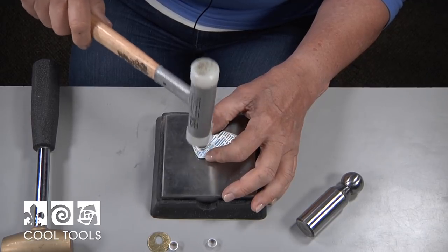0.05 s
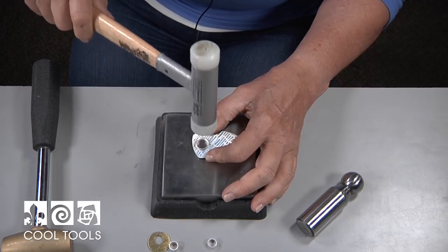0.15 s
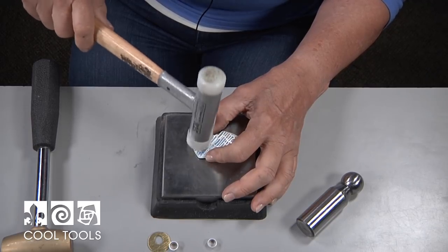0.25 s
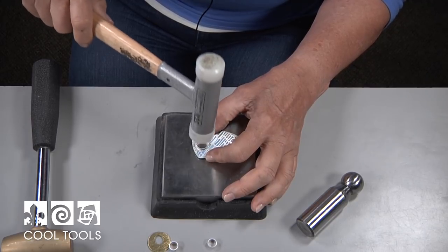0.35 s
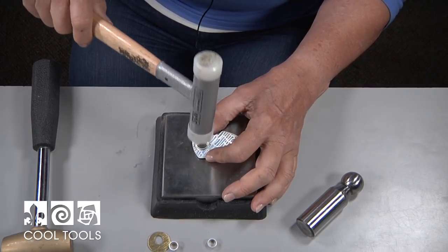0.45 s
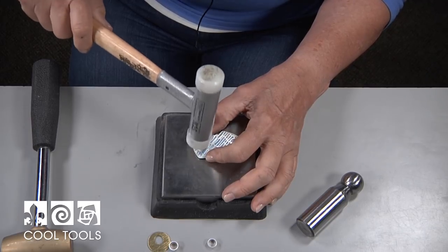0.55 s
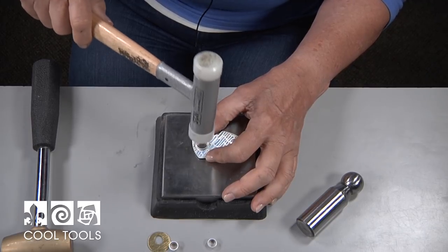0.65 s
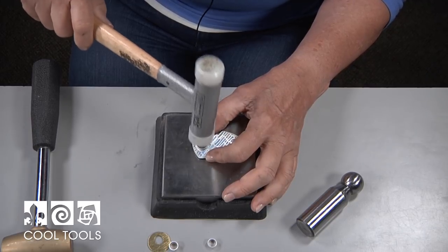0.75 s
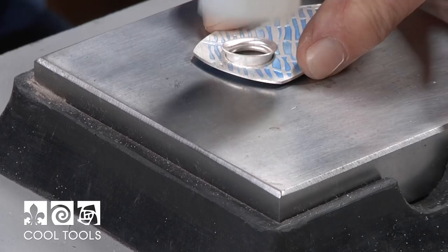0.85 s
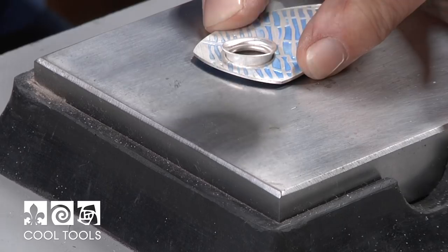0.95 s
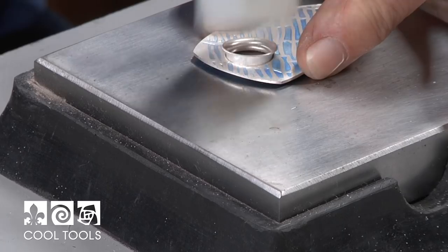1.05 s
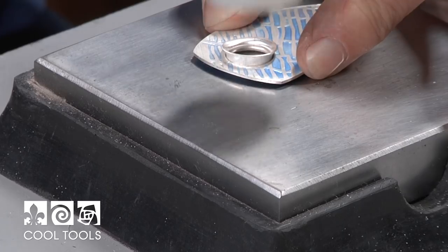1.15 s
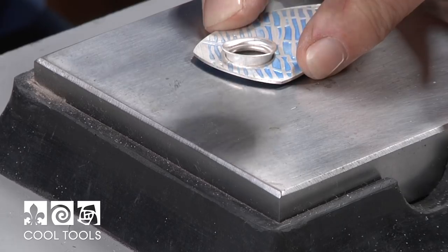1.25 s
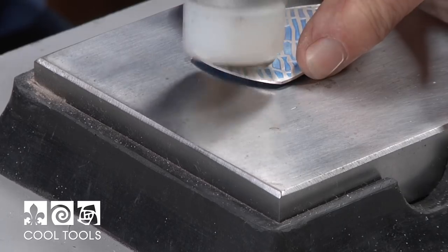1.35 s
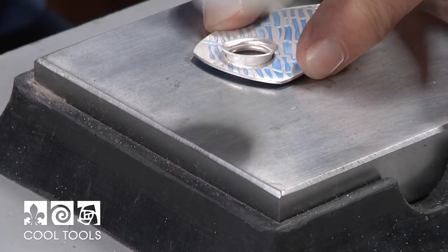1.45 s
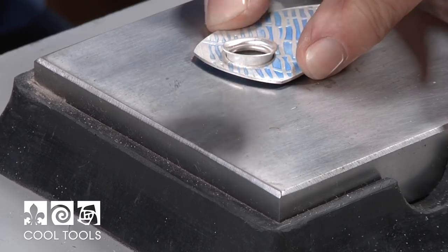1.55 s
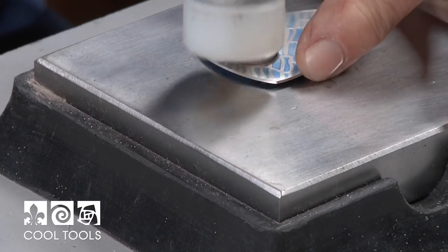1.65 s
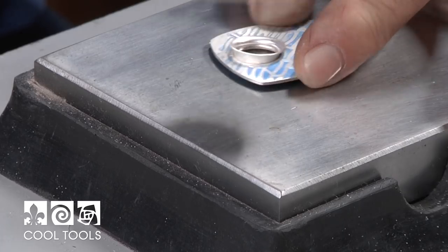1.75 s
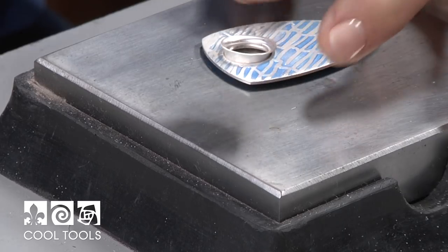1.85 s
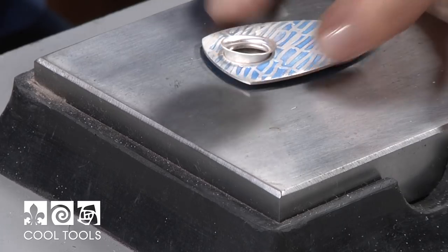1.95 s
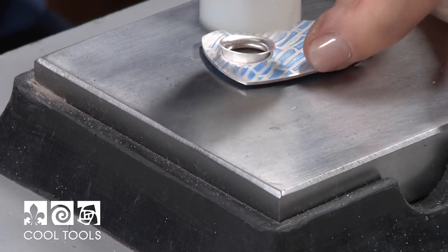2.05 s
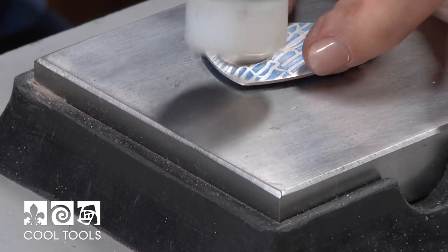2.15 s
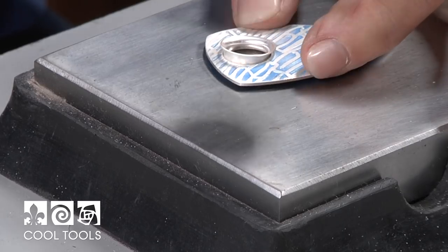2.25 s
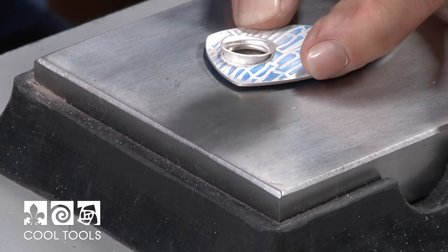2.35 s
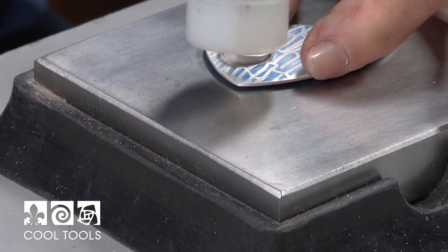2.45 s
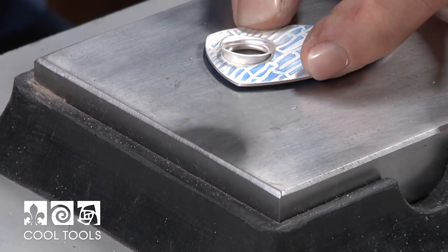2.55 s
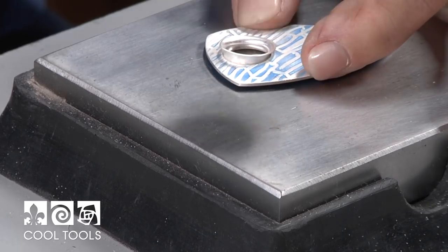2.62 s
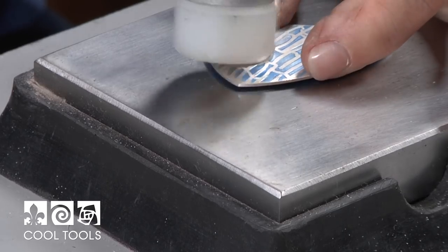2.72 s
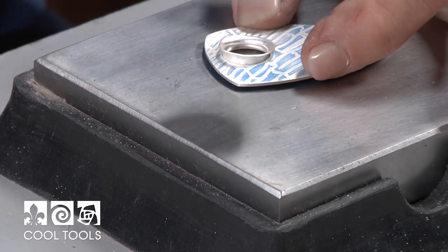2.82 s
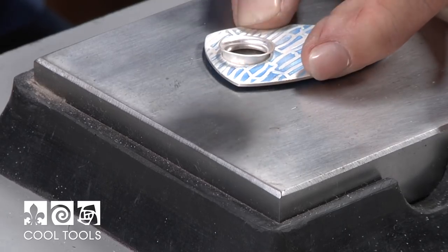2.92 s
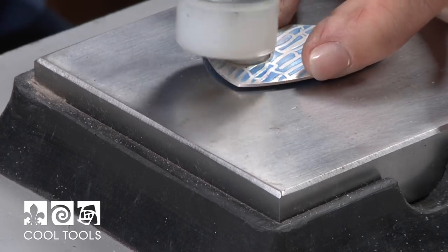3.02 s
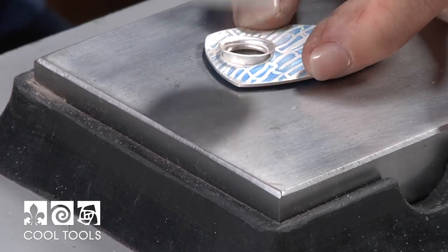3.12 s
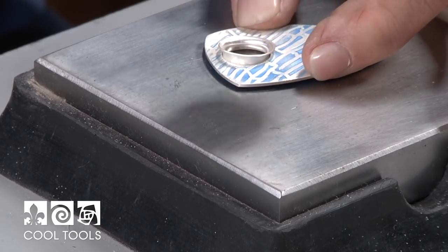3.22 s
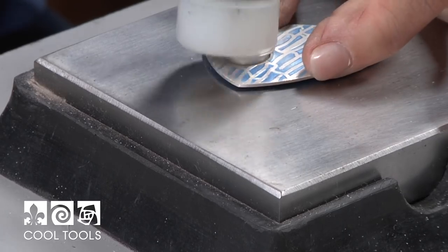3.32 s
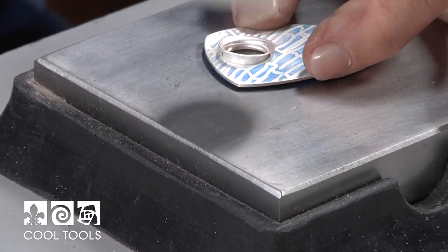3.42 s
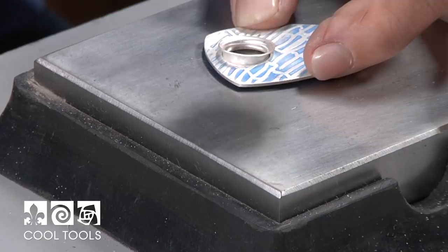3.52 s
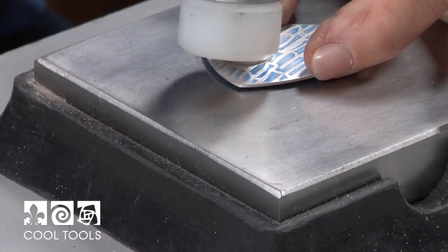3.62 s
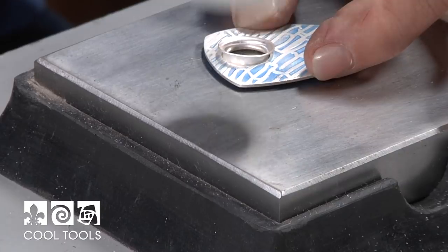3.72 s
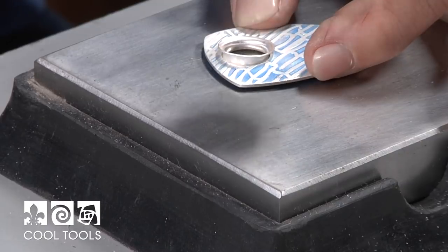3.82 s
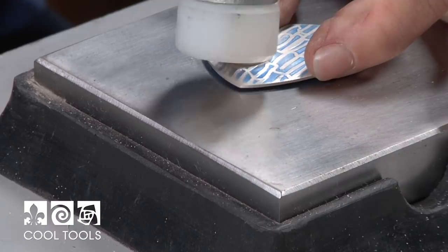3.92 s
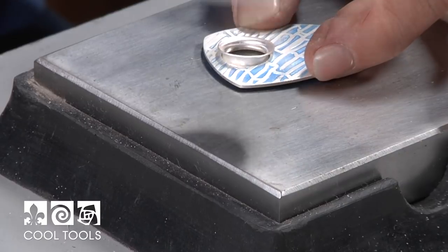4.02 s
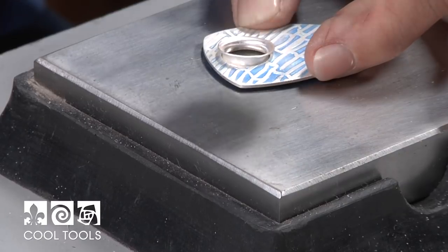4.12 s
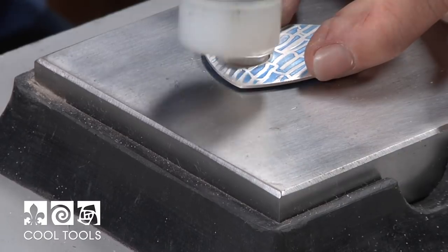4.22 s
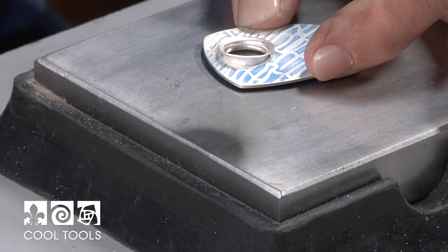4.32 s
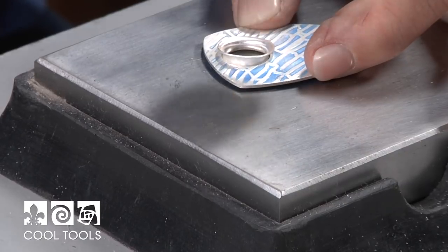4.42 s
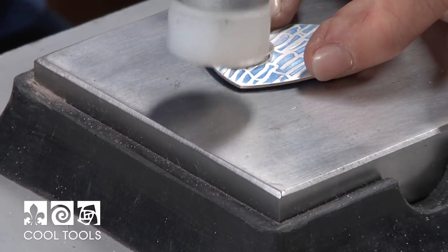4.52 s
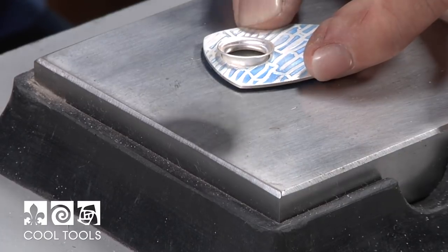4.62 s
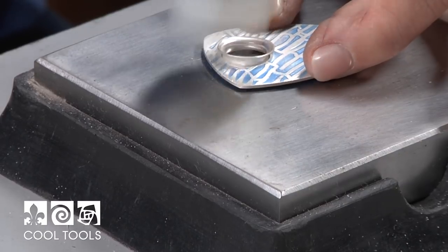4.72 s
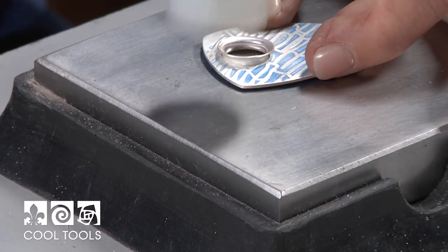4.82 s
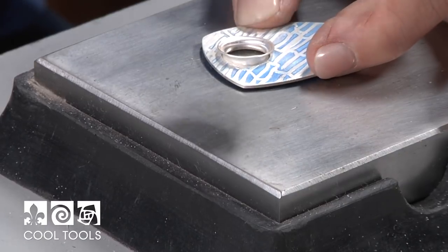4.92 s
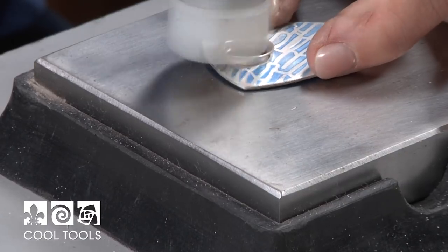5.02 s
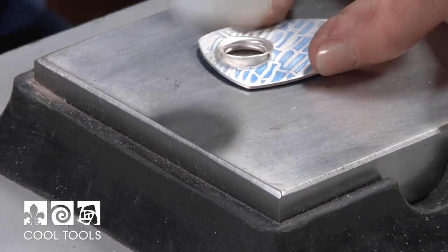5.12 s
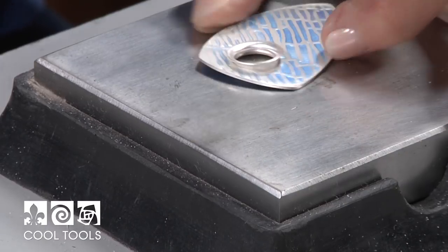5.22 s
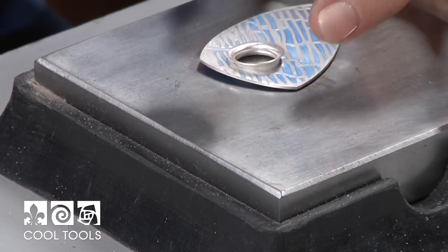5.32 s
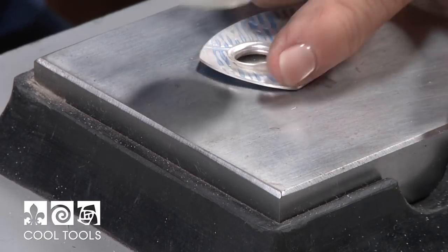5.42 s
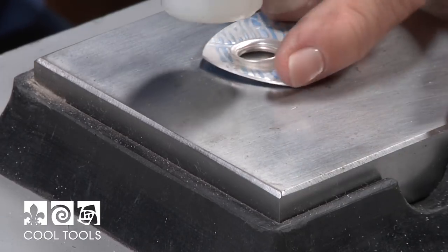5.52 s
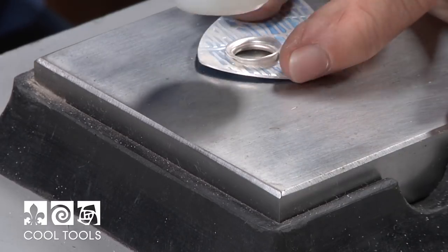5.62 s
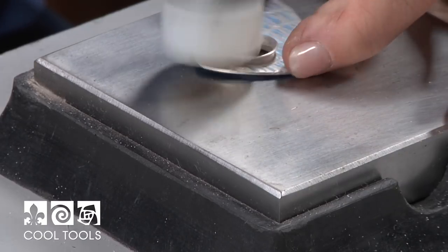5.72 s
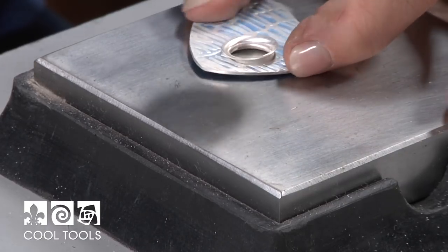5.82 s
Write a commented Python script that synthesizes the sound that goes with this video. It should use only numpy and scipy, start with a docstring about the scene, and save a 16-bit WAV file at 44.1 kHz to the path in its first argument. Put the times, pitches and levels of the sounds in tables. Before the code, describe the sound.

A plastic-faced mallet taps a small silver piece on a steel block in steady hard knocks, with metallic chatter and faint ring, in a small workshop.

```python
"""A plastic-faced mallet taps a silver rivet on a steel bench block, about three and a half blows a second.
Each blow thuds through the block's rubber base into the bench, knocks the more sharply the harder it lands,
chatters the silver against the steel and rings the block faintly. Twice the fingers shift the piece, which
ticks and scrapes on the steel. All is close to the microphone; a small workshop answers over a low rumble.
Thud, ring and silver are decaying modes; knock, chatter, echo and room air are shaped noise."""
import sys
import numpy as np
from scipy import signal
from scipy.fft import rfft, irfft
from scipy.io import wavfile

SR = 44100
rng = np.random.default_rng(int(sys.argv[2]) if len(sys.argv) > 2 else 0)


def store_wav(level_fs):
    """Save 16-bit WAV to argv[1]."""
    pcm = np.round(np.clip(np.atleast_2d(level_fs), -1, 1) * 32767)
    wavfile.write(sys.argv[1], SR, pcm.T.astype(np.int16))


N = 258867
T = np.arange(SR // 2) / SR  # seconds since a sound began
HEAD = SR // 20  # level() sets the rms of a sound's first twentieth of a second


def undb(db):
    """Decibels to gain."""
    return 10 ** (np.asarray(db) / 20)


def level(x, db):
    """Set the rms level of a short sound over its head."""
    return x * undb(db) / np.sqrt(np.mean(x[:HEAD] ** 2))


def add(out, start_s, x):
    """Mix x into out, starting at start_s."""
    i = max(int(start_s * SR), 0)
    out[i:i + len(x)] += x[:N - i]


def curve(hz, points):
    """Read (Hz, value) points on a log-frequency axis."""
    point_hz, value = np.transpose(points)
    return np.interp(np.log(hz + 1), np.log(point_hz), value)


def colour(x, db_at, size=4096):
    """Causal filter with the gain db_at(Hz), built from the cepstrum."""
    cepstrum = irfft(np.log(undb(db_at(np.fft.rfftfreq(size, 1 / SR)))))
    # fold the cepstrum forward in time: minimum phase
    cepstrum[1:size // 2] *= 2
    cepstrum[size // 2 + 1:] = 0
    impulse_response = irfft(np.exp(rfft(cepstrum)))
    return signal.fftconvolve(x, impulse_response)[:len(x)]


def bump(hz, centre_hz, width_hz):
    """Shape of one resonance, 1 at its centre."""
    return 1 / (1 + ((hz - centre_hz) / width_hz) ** 2)


def fade(t60_s):
    """Exponential decay, down 60 dB after t60_s."""
    return np.exp(-np.log(1000) * T / t60_s)


def later(x, delay_s):
    """Delay a short sound."""
    return np.interp(T - delay_s, T, x, left=0)


def grit(count, spread_db=4):
    """Dense tiny contacts of uneven size."""
    chance = rng.standard_normal((count, 2))
    return chance[:, 0] * undb(spread_db * chance[:, 1])


# mallet blows, close to the microphone; levels before the trims in mallet() and the scale in steel()
# start_s, force_db, chatter_db, chatter_pitch_hz, ring_db
MALLET_BLOWS = [(0.0234, -20.5, -39.5, 9400, -55.5), (0.2977, -19, -39, 9800, -53.5),
                (0.558, -18, -34.5, 8200, -53.5), (0.838, -19, -39, 9600, -57.5),
                (1.1439, -19, -36.5, 9600, -56.5), (1.4286, -20, -46, 7600, -55),
                (1.7128, -17.5, -37.5, 9400, -61), (2.1704, -26, -47.5, 15200, -83),
                (2.489, -19.5, -44.5, 10700, -57.5), (2.7941, -18.5, -40.5, 6750, -58),
                (3.0782, -17.5, -41.5, 7100, -47.5), (3.3888, -20, -44, 11700, -57),
                (3.6806, -17, -36, 6900, -51.5), (3.984, -18, -39, 6500, -60),
                (4.2656, -17.5, -40.5, 5100, -51), (4.538, -17, -37, 10800, -50),
                (4.8127, -17, -39.5, 5000, -54.5), (5.1003, -17, -33.5, 10300, -52.5),
                (5.806, -24.5, -43, 10500, -82)]
# a harder blow squeezes the plastic face stiff: the knock grows faster than the thud
USUAL_FORCE_DB, KNOCK_DB = -18, -32  # knock before its trim
HARDENING = 0.69  # extra dB of knock per dB of force
# chatter at a higher pitch is brighter all over
USUAL_PITCH_HZ, BRIGHT_DB, BRIGHT_DB_PER_OCTAVE = 8000, 3.5, 3
# the steel's other modes against its main one near 3.7 kHz: they come forward when it rings well
USUAL_RING_DB, OTHER_MODES_DB = -50.5, -4.5
OTHER_GROWTH = 0.47  # extra dB per dB of ring
# the silver's buzz follows the force more than the first chatter does
BUZZ_DB = -43.5  # for a chatter as strong as the force
BUZZ_FOLLOWS_FORCE = 0.97  # share


def mallet(thud_trim_db=0.0, knock_trim_db=2.0, chatter_trim_db=-1, usual_hardness_db=-1.8, block_lag_s=0.00078):
    """Each blow's force shapes its sound; the swinging arm and mallet change part of the echo's paths."""
    out = np.zeros(N)
    walls = echo()
    small_radiator = signal.butter(2, 85, "high", fs=SR, output="sos")
    for start_s, force_db, chatter_db, pitch_hz, ring_db in MALLET_BLOWS:
        extra_db = force_db - USUAL_FORCE_DB
        hardness_db = usual_hardness_db + HARDENING * extra_db
        knock_db = KNOCK_DB + (1 + HARDENING) * extra_db
        bright_db = BRIGHT_DB + BRIGHT_DB_PER_OCTAVE * np.log2(pitch_hz / USUAL_PITCH_HZ)
        buzz_db = BUZZ_DB + BUZZ_FOLLOWS_FORCE * (force_db - chatter_db)
        other_db = ring_db + OTHER_MODES_DB + OTHER_GROWTH * (ring_db - USUAL_RING_DB)

        body = level(later(thud(hardness_db), block_lag_s), force_db)
        body = body + slap(knock_db, hardness_db)
        impact = level(signal.sosfilt(small_radiator, body), force_db + thud_trim_db)
        impact = impact + level(knock(hardness_db), knock_db + knock_trim_db)
        impact = impact + level(chatter(bright_db, pitch_hz, buzz_db), chatter_db + chatter_trim_db)
        ring = steel(ring_db, other_db)
        paths = .6 * walls + .8 * echo()  # lasting and changing paths
        reflected = colour(paths, lambda hz: radiated(impact, hz))
        add(out, start_s, impact + ring + reflected)
    return out


# modes of the block on its rubber base and the bench under it; relative levels, pitch varies a little per blow
# pitch_hz, level_db, t60_s
BENCH_MODES = [ (79, -45, .5), (98, -32, .55), (143, -20, .19), (166, -13, .08), (212.7, -8.5, 0.034),
               (208.6, -38, 0.72), (314.4, -20, 0.11), (365.1, -2.5, 0.067), (449.5, -15.5, 0.15),
               (510, -37, 0.056), (703.3, -10, 0.045), (910.5, -13, 0.073), (1215, -12.5, 0.046),
               (1435, -10.5, 0.036)]


def thud(hardness_db, contact_s=0.00025, rebound_s=0.002385, rebound=0.37, firming=0.048):
    """The face pushes the block into the bench and the rubber base pushes back; hard blows are shorter."""
    push_s = contact_s * np.exp(-firming * hardness_db)
    force = T * np.exp(-T / push_s)
    push_back_s = rebound_s * (1 + 0.091 * rng.standard_normal())
    force = force - rebound * later(force, push_back_s)
    bench = 0
    for hz, db, t60_s in BENCH_MODES:
        mode_hz = hz * (1 + 0.0014 * rng.standard_normal())
        bench = bench + undb(db) * fade(t60_s) * np.cos(2 * np.pi * mode_hz * T)
    sinking = 1 - np.exp(-T / .0008)
    return -signal.fftconvolve(force, bench)[:len(T)] * sinking


def slap(knock_db, hardness_db, after_s=0.00568, width_s=0.00041, above_knock_db=23.5, steepness=1.7):
    """A hard blow lifts the base, which slaps back on the bench as one sharp pulse."""
    peak = undb(knock_db + above_knock_db + steepness * hardness_db)
    return -peak * np.exp(-((T - after_s) / width_s) ** 2)


# colour of the mallet's knock, before the head resonance and overall level
# pitch_hz, level_db
KNOCK_COLOUR = [(300, 12.5), (700, 13.5), (1000, 13.5), (1450, 6.5), (1750, 3), (2600, 1), (3500, -5),
                (7000, -20)]


def knock(hardness_db, t60_s=0.14, head_hz=1470, head_width_hz=110, head_gain=0.57):
    """Dry knock of the mallet head, whose resonance stands out in hard blows."""
    contacts = rng.standard_normal(len(T)) * fade(t60_s)
    head_db = head_gain * hardness_db
    return colour(contacts, lambda hz: curve(hz, KNOCK_COLOUR) + head_db * bump(hz, head_hz, head_width_hz))


# colour of the silver chattering on the steel, before the tilt and peak of each blow
# pitch_hz, level_db
CHATTER_COLOUR = [(1200, -6), (2500, -13.5), (4200, 1), (6300, 5.5), (8800, 2), (9700, 5.5), (11200, -1),
                  (12600, 0.5), (14200, -4.5), (15500, -4), (16500, -5)]


def chatter(bright_db, pitch_hz, buzz_db, t60_s=0.0084, again_s=0.0027, again=0.38, buzz_t60_s=0.22,
            peak_db=5.5, width_hz=400):
    """The silver is slammed flat, chatters on the steel in two quick bursts and buzzes out."""
    burst = fade(t60_s) * (1 - np.exp(-T / 0.00028))
    buzz = undb(buzz_db) * fade(buzz_t60_s)
    contacts = grit(len(T)) * (burst + again * later(burst, again_s) + buzz)
    tilt = [(5000, -.6 * bright_db), (12000, 0.18 * bright_db)]

    def gain_db(hz):
        """Colour, tilt and pitch peak of this chatter."""
        return curve(hz, CHATTER_COLOUR) + curve(hz, tilt) + peak_db * bump(hz, pitch_hz, width_hz)
    return colour(contacts, gain_db)


# modes of the ringing steel, main mode first; relative levels
# pitch_hz, level_db, t60_s
STEEL_MODES = [ (3697, 1.5, .28), (2650, -1, .2), (5164, 1.5, .25), (6568, -3, .2), (7160, -2, .24),
               (10240, -2.5, .28), (10530, -3, .26), (11730, -3.5, .22), (13550, -8, .2)]


def steel(main_db, other_db):
    """Thin ring that swells over the first hundredths of a second, as the room answers; paired modes flutter."""
    out = 0
    for k, (hz, db, t60_s) in enumerate(STEEL_MODES):
        strength_db = other_db + 2 * rng.standard_normal() if k else main_db
        neighbour_hz = hz + 10 * rng.standard_normal()
        pair = np.sin(2 * np.pi * hz * T) + .5 * np.sin(2 * np.pi * neighbour_hz * T)
        out = out + undb(db + strength_db) * fade(t60_s) * pair
    return 2.6 * out * (1 - np.exp(-T / .012))


# the piece touches down on the steel
# start_s, level_db, pitch_hz
PIECE_TICKS = [(1.8734, -45.5, 6570), (2.0523, -56, 15300), (2.071, -49.5, 15300), (2.116, -59, 6050),
               (5.4978, -58, 9600), (5.5028, -48, 9400), (5.621, -57.5, 11800), (5.6757, -61, 7700),
               (5.766, -57, 7500)]
TICK_S = 0.0039  # time constant of a tick's contacts
# the piece slides; level_db is for the squeak, set before its swell
# start_s, end_s, level_db, pitch_hz
PIECE_SLIDES = [(1.828, 1.914, -58, 6020), (1.894, 2.053, -62.5, 6450), (5.235, 5.307, -59, 9440)]
SQUEAK_RISE = 0.062  # share by which the pitch climbs over a slide as the grip tightens


def handling(squeak_width_hz=130, scrape_db=1, scrape_spread_db=9):
    """Fingers move the silver: light ticks, and slides that squeak faintly over a gritty scrape."""
    out = np.zeros(N)
    for start_s, db, pitch_hz in PIECE_TICKS:
        contacts = grit(len(T)) * np.exp(-T / TICK_S)
        add(out, start_s, level(silver(contacts, pitch_hz), db))
    for start_s, end_s, db, pitch_hz in PIECE_SLIDES:
        progress = np.clip(T / max(end_s - start_s, .01), 0, 1)
        grip = signal.lfilter(*signal.butter(2, squeak_width_hz, fs=SR), grit(len(T)))
        squeak_hz = pitch_hz * (1 + SQUEAK_RISE * progress)
        squeak = grip * np.sin(2 * np.pi * np.cumsum(squeak_hz) / SR)
        scrape = silver(grit(len(T), scrape_spread_db), pitch_hz)
        swell = np.sin(np.pi * progress)
        add(out, start_s, swell * (level(squeak, db) + level(scrape, db + scrape_db)))
    return out


# modes of the silver piece under the fingers, before the grip's detuning; relative levels
# pitch_hz, level_db, t60_s
SILVER_MODES = [(2230, -5, .02), (6000, -0.5, 0.044), (6820, 5.5, 0.034), (7930, 12.5, 0.013),
                (9500, 6, 0.012), (10670, 10.5, 0.018), (11500, 4, .01), (14100, -15, .008),
                (15800, -3, 0.012)]


def silver(x, pitch_hz, favour_db=9, width_hz=400, contact_db=29):
    """The thin piece rings briefly; the grip detunes its modes and favours those near one pitch."""
    chance = rng.standard_normal((len(SILVER_MODES), 2))
    ring = 0
    for (hz, db, t60_s), (detune, share) in zip(SILVER_MODES, chance):
        gain = undb(db + 2 * share + favour_db * bump(hz, pitch_hz, width_hz))
        mode_hz = hz * (1 + 0.016 * detune)
        ring = ring + gain * fade(t60_s) * np.cos(2 * np.pi * mode_hz * T)
    bare_contact = signal.sosfilt(signal.butter(4, 5500, "high", fs=SR, output="sos"), x)
    return signal.fftconvolve(x, ring)[:len(T)] + undb(contact_db) * bare_contact


# the piece tips flat just before a blow
# start_s, level_db
PIECE_SETTLES = [(.011, -55.5), (0.2635, -61.5), (4.534, -49), (5.087, -60)]


def settling(t60_s=0.0083, pitch_hz=1800, width_hz=1500, peak_db=36):
    """Pressed by the fingers, the piece tips flat with a small dull click."""
    out = np.zeros(N)
    for start_s, db in PIECE_SETTLES:
        contacts = rng.standard_normal(len(T)) * fade(t60_s)
        click = colour(contacts, lambda hz: peak_db * bump(hz, pitch_hz, width_hz))
        add(out, start_s, level(click, db))
    return out


# echo of the small workshop; level_db is against the direct sound
# pitch_hz, level_db, t60_s
WORKSHOP_ECHO = [(57.6, -17, 1), (109, -1, 0.31), (181, -17, 0.36), (297.5, -3.5, 0.51), (391, -13, 0.56),
                 (555, -2.5, 0.46), (1090, -2.5, 0.55), (2300, -4.5, 0.49), (4400, -6.5, 0.45),
                 (8660, -10.5, 0.45), (16000, -2.5, 0.27)]


def echo(first_s=0.0035, build_s=0.00074):
    """One diffuse response of the workshop: noise in bands, each with its own level and decay."""
    room_hz, room_db, room_t60_s = np.transpose(WORKSHOP_ECHO)
    hz = np.fft.rfftfreq(len(T), 1 / SR)
    edges = np.geomspace(50, 18000, 19)[:, None]
    lo, hi = edges[:-1], edges[1:]
    centre = np.sqrt(lo * hi)
    onset = 1 - np.exp(-np.maximum(T - first_s, 0) / build_s)
    tails = irfft(rfft(rng.standard_normal(len(T))) * ((hz >= lo) & (hz < hi)), len(T))
    tails = tails * onset * fade(curve(centre, np.c_[room_hz, room_t60_s]))
    # equal energy per Hz before the bands' own levels
    unit = np.sqrt(2 * (hi - lo) / SR / np.sum(tails ** 2, axis=1, keepdims=True))
    gain = undb(curve(centre, np.c_[room_hz, room_db]))
    return np.sum(gain * unit * tails, axis=0)


def radiated(x, hz, spread=0.11, spread_hz=25):
    """Spectrum in dB that reaches the walls: all directions together smooth out the fine peaks."""
    bin_hz = np.fft.rfftfreq(len(x), 1 / SR)
    energy = np.cumsum(np.abs(rfft(x)) ** 2)
    half = spread * hz + spread_hz
    band = np.interp(hz + half, bin_hz, energy) - np.interp(hz - half, bin_hz, energy)
    power = band * bin_hz[1] / (2 * half)
    return 10 * np.log10(power + 1e-9)


# colour of the steady workshop air; relative level per Hz
# pitch_hz, level_db
AIR_COLOUR = [(15, -29), (25, 10), (180, -1.5), (301, 4.5), (489, -17.5), (545, -7.5), (624, -11),
              (1020, -11.5), (1890, -21), (2610, -21.5), (3920, -31), (10100, -35.5), (16000, -37)]
AIR_DB = -48.5  # rms of the whole background


def air():
    """Steady low rumble and faint hiss of the room, as coloured noise."""
    hz = np.fft.rfftfreq(N, 1 / SR)
    x = irfft(rfft(rng.standard_normal(N)) * undb(curve(hz, AIR_COLOUR)), N)
    return x * undb(AIR_DB) / x.std()


def scene(handling_room_db=-4):
    """Blows and handling close to the microphone, in the workshop."""
    blows = mallet()
    piece = handling() + settling()
    piece_echo = undb(handling_room_db) * signal.fftconvolve(piece, echo())[:N]
    return (blows + piece + piece_echo + air())[None]


TOP_HZ = 16100  # the recorder's upper limit


def record(dry):
    """The recorder rounds the highest peaks and cuts the top."""
    rounded = dry / (1 + (dry / .95) ** 6) ** (1 / 6)
    return signal.sosfilt(signal.ellip(8, .2, 70, TOP_HZ, fs=SR, output="sos"), rounded)


dry = scene()
out = record(dry)
store_wav(out)
```